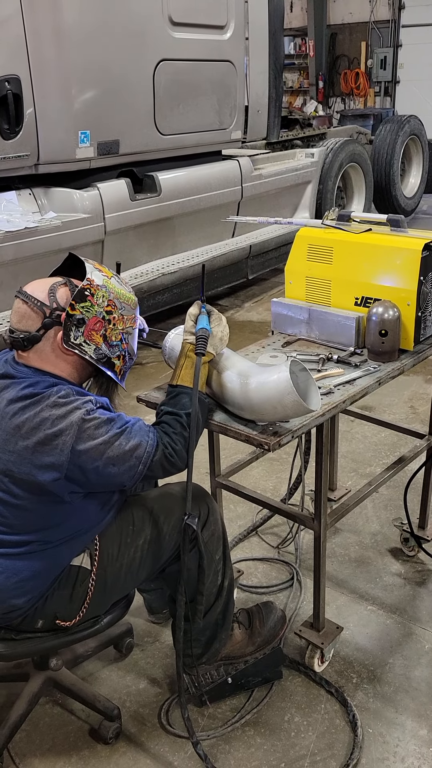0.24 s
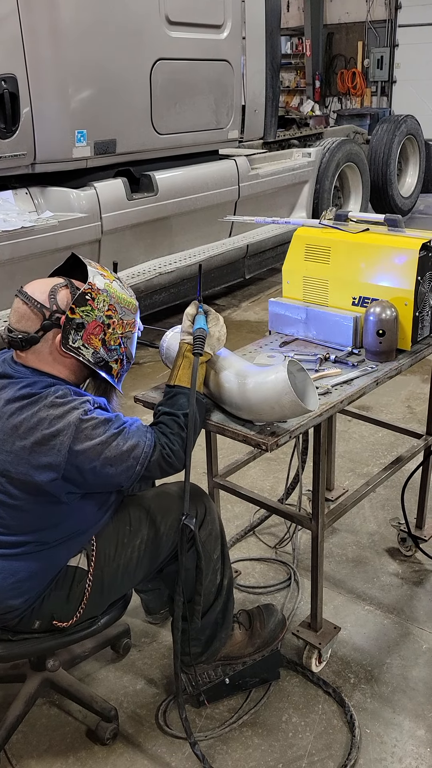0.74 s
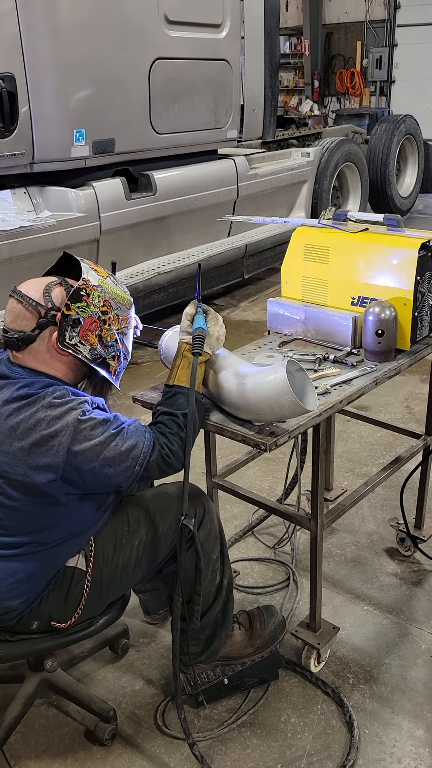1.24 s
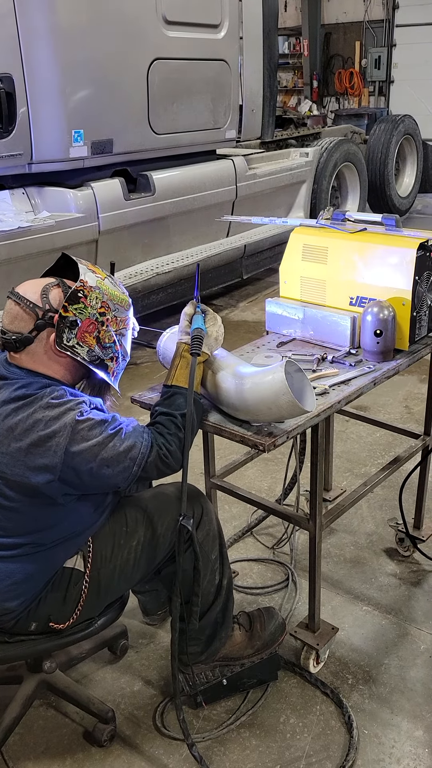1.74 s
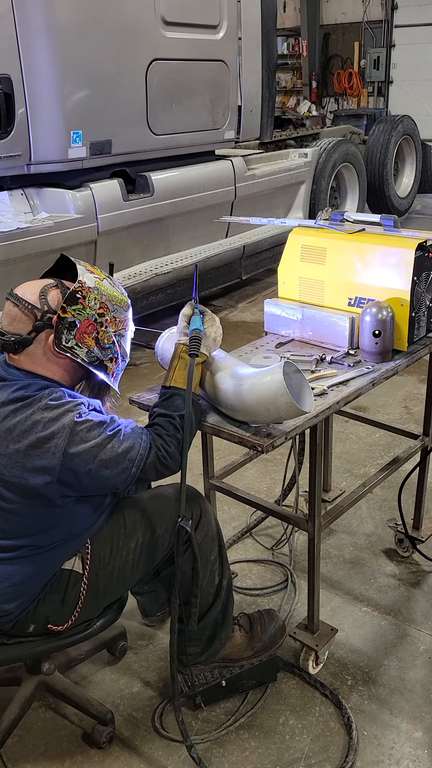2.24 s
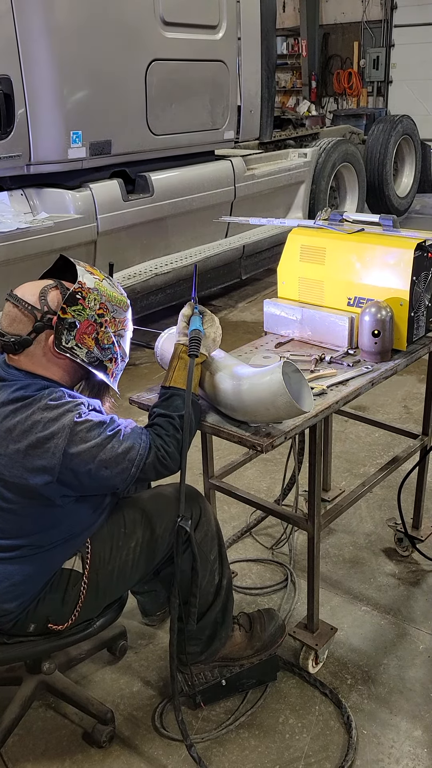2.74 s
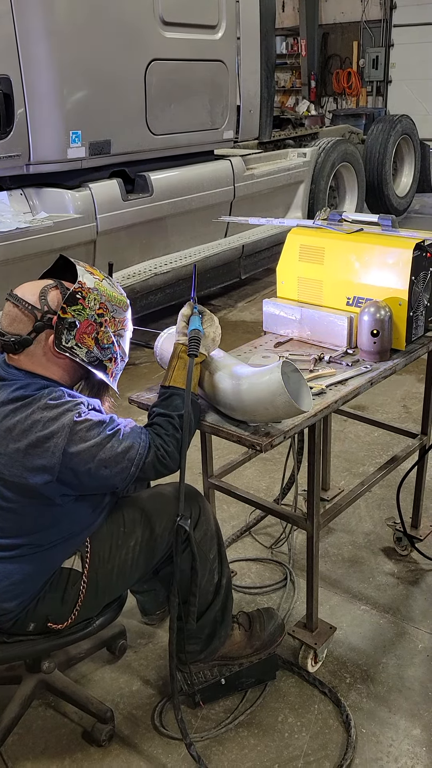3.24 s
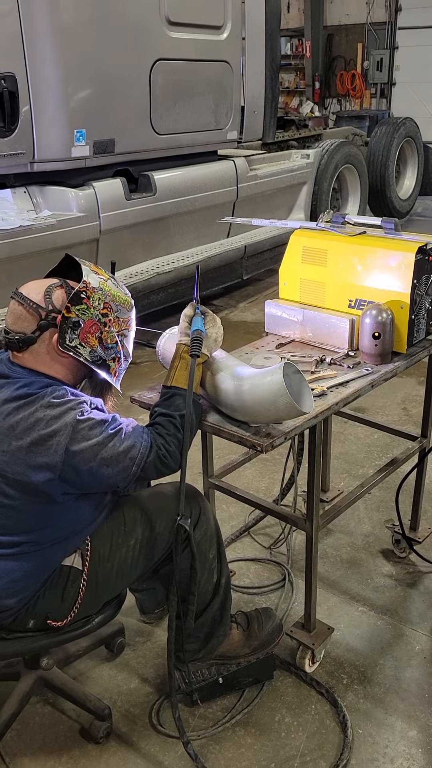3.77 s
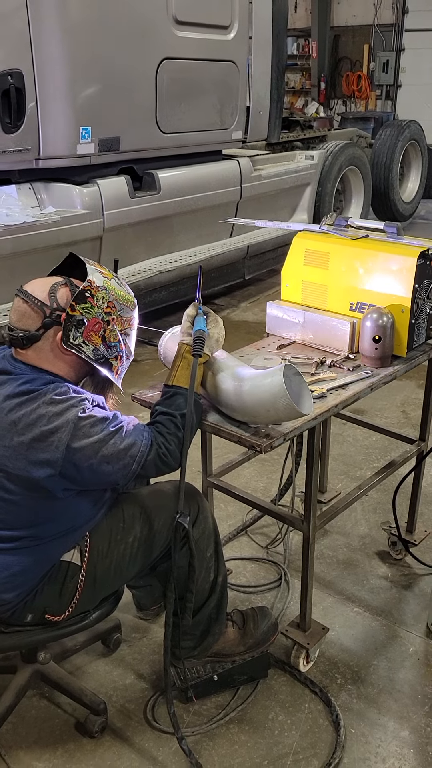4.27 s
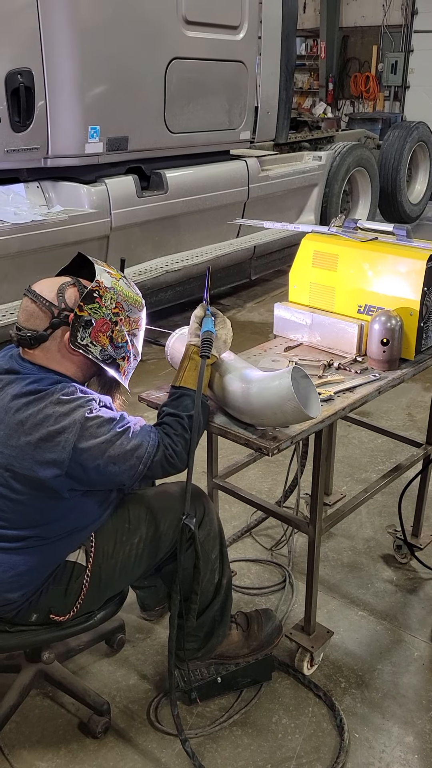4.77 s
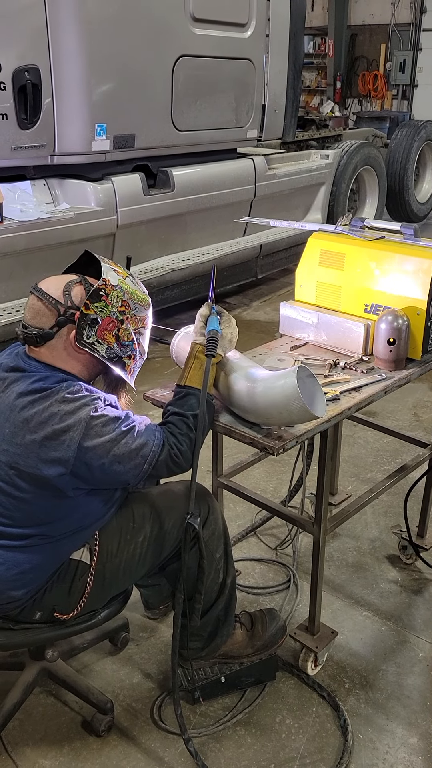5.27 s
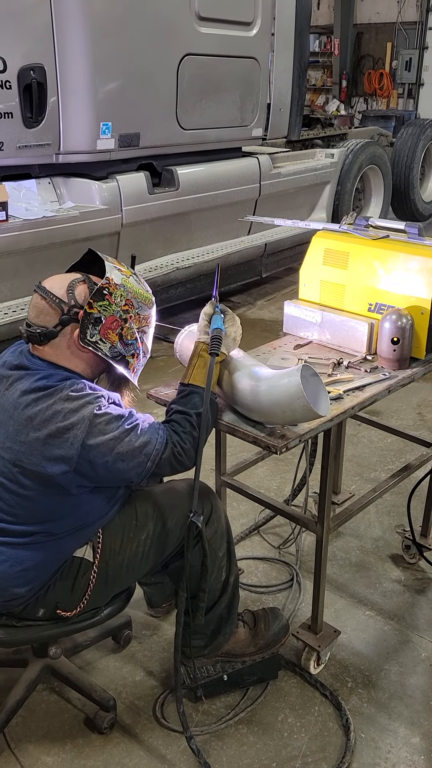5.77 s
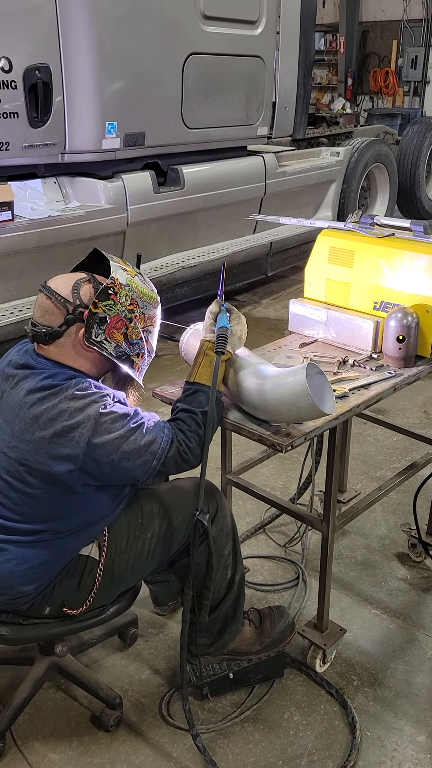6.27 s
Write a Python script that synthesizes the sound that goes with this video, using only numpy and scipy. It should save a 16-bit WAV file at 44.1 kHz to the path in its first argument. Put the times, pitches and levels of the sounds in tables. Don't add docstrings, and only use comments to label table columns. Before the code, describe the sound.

In a large vehicle workshop, a welding arc on an aluminium tube first stutters in rapid, dull, spitting pops for about a second, briefly dropping out twice. It then sputters unevenly and settles into a steady, harsh, bright buzz with fine hiss and thin whistle. Close echoes off bench and tube lead into a faint hall tail; fan and transformer hum below. A few dry ticks sound near the stereo microphone.

```python
import sys
import numpy as np
from scipy import signal
from scipy.fft import rfft, irfft, next_fast_len
from scipy.io import wavfile
from scipy.ndimage import uniform_filter1d, map_coordinates

SR = 44100
rng = np.random.default_rng(int(sys.argv[2]) if len(sys.argv) > 2 else 0)


def dump(signal):
    limited = np.clip(np.atleast_2d(signal).T, -1, 1)
    pcm = np.round(limited * 32767).astype(np.int16)
    wavfile.write(sys.argv[1], SR, pcm)


def volts_from_decibels(level):
    exponent = np.asarray(level, float) / 20
    return 10 ** exponent


N = 287091
PADDED = next_fast_len(N + SR // 2, True)
CYCLE_HZ = 66.47
BENCH_S = 0.00225


def seconds():
    return np.arange(N) / SR


def bins():
    return np.maximum(np.fft.rfftfreq(PADDED, 1 / SR), 1)


def at_hz(points, hz):
    table_hz, value = np.array(points).T
    return np.interp(np.log(hz), np.log(table_hz), value)


def rms_one(x):
    return x / np.sqrt(np.mean(x ** 2) + 1e-20)


def shaped(x, response):
    return irfft(rfft(x, PADDED) * response, PADDED)[..., :N]


def colour(x, spectrum):
    gain = volts_from_decibels(at_hz(spectrum, bins()))
    return shaped(x, rms_one(gain))


def clicks(at_s, sizes):
    at = np.asarray(at_s) * SR
    near = np.floor(at)[:, None].astype(int) + np.arange(-7, 9)
    gap = near - at[:, None]
    shape = np.sinc(gap) * np.cos(np.pi * gap / 16) ** 2
    return np.bincount(np.clip(near, 0, N - 1).ravel(), (shape * sizes[:, None]).ravel(), N)


def sputter(strikes, length_s, fresh):
    keep = np.exp(-1 / (length_s * SR))
    noise = rng.standard_normal(N)
    new = signal.lfilter([1], [1, -keep], np.abs(strikes) + 1e-18) * noise
    same = signal.fftconvolve(strikes, keep ** np.arange(400) * noise[:400])[:N]
    return np.sqrt(fresh) * new + np.sqrt(1 - fresh) * same


# time in seconds, middle of the two reversals in ms.
BEAT_ARRIVAL = [(1.08, 11.04), (2.53, 10.985), (3.82, 10.915), (4.3, 10.885), (4.78, 10.793),
                (5.27, 10.675), (5.75, 10.584), (6.23, 10.53), (6.51, 10.52)]
# time in seconds, first to second reversal in ms.
HALF_CYCLES = [(1.08, 7.17), (1.56, 7.72), (1.81, 8.14), (1.93, 8.03), (2.05, 8.15), (2.29, 8.66),
               (2.53, 8.803), (3.34, 8.796), (3.82, 8.849), (4.3, 8.836), (5.75, 8.842), (6.42, 8.856)]
# time in seconds, first reversal in dB, relight sputter in dB,
# second reversal against the first in dB.
ARC_STRENGTH = [(1.0, -18.5, -55, -14), (1.2, -12, -18.5, -3), (1.35, -14, -25, -13), (1.5, -17, -21, -4),
                (1.75, -10.5, -19.5, -8), (2.1, -12, -21, -5), (2.3, -8, -22, -4.5), (2.55, -7.5, -29, -9),
                (3.4, -8.5, -27, -7), (3.9, -9, -19.5, -10), (4.4, -9.5, -25.5, -7.5),
                (5.0, -10, -53, -7.5), (5.5, -10.5, -52, -8), (6.51, -12, -53, -4.5)]
# time in seconds, peak in dB.
JUMP_FLARES = [(1.3601, -17), (1.4953, -12), (1.601, -11), (1.7208, -14.5), (1.826, -15), (1.8565, -20),
               (1.9023, -16), (1.9313, -20), (1.9467, -15.5), (2.0216, -18), (2.0365, -16), (2.1872, -12.5),
               (2.2321, -18), (2.2775, -17.5), (2.3523, -18), (2.3977, -18)]
# time in seconds, peak in dB.
RELIGHT_SPITS = [(1.2648, -18), (1.3701, -20), (1.386, -16), (1.4299, -15), (1.4753, -19), (1.5053, -14),
                 (1.5202, -21), (1.5506, -22), (1.5651, -18), (1.5955, -13), (1.6559, -14.5), (1.6863, -18),
                 (1.7013, -17.5), (1.7312, -20), (1.7452, -20), (1.7916, -18), (1.82, -19), (1.8365, -21),
                 (1.85, -19.5), (1.9707, -21.5), (2.0171, -19), (2.046, -16), (2.1209, -22), (2.1358, -19),
                 (2.2266, -21), (2.3314, -22), (2.3618, -16)]


def jump_plan():
    start = np.arange(int(1.01 * CYCLE_HZ), int(N / SR * CYCLE_HZ)) / CYCLE_HZ
    middle_ms = np.interp(start, *np.transpose(BEAT_ARRIVAL))
    gap_ms = np.interp(start, *np.transpose(HALF_CYCLES))
    row_s, *levels = np.transpose(ARC_STRENGTH)
    first_db, sputter_db, second_db = [np.interp(start, row_s, level) for level in levels]
    second_db = first_db + second_db
    first_s = start + (middle_ms - gap_ms / 2) / 1000
    second_s = start + (middle_ms + gap_ms / 2) / 1000

    for s, db in JUMP_FLARES:
        k = np.argmin(np.abs(first_s - s))
        first_db[k] = first_db[k] + max(db + 19.5, 0)
    for s, db in RELIGHT_SPITS:
        k = np.argmin(np.abs(second_s + BENCH_S / 2 - s))
        sputter_db[k] += max(db + 22, 0)

    unrest_cold, unrest_hot, settle_s = 4.5, 0.85, 0.79
    unrest = unrest_hot + (unrest_cold - unrest_hot) * np.exp(-(start - start[0]) / settle_s)
    chance = np.clip(rng.standard_normal((len(start), 5)), -3, 1.5) * unrest[:, None]
    burst_s = second_s
    first_s = first_s + 1.5e-6 * chance[:, 0]
    second_s = second_s + 4e-6 * chance[:, 2]
    first_db = first_db + 0.96 * chance[:, 1]
    second_db = second_db + 0.21 * chance[:, 3]
    swing_db = np.minimum(0.5 * chance[:, 4], 1.2)
    burst_db = sputter_db - 2.0 + swing_db
    return (first_s, first_db), (second_s, second_db), (burst_s, burst_db)


# frequency in Hz, level in dB per Hz.
JUMP_SPECTRUM = [(180, -41), (400, -21.5), (600, -31.5), (1000, -11), (1500, -5), (2400, -4.5), (3640, 3),
                 (4670, 5), (6300, 3.5), (7600, -2), (9000, -12.5), (10800, -10.5), (12300, 6), (16000, -1)]
# frequency in Hz, level in dB per Hz.
RELIGHT_SPECTRUM = [(1500, -22), (5500, 0.5), (8500, -13.5), (10500, -8), (12500, 6.5), (16000, -1)]
# frequency in Hz, level in dB per Hz.
OXIDE_THUMP_SPECTRUM = [(300, -18), (600, -15), (750, 0.5), (950, -0.5), (1350, 8.5), (1700, 5),
                        (2200, -32), (4000, -15)]


def reversals():
    first, second, strikes = [clicks(s, volts_from_decibels(db)) for s, db in jump_plan()]
    lopsided_turn = 1.76
    slowed = signal.lfilter([0.7], [1, -0.3], second + 1e-18)
    lopsided = shaped(slowed, np.exp(1j * lopsided_turn))
    bursts = sputter(strikes, length_s=0.0014, fresh=0.61)

    oxide_until_s, clearing_s = 2.35, 0.1
    cold = 1 / (1 + np.exp((seconds() - oxide_until_s) / clearing_s))
    snap = volts_from_decibels(4.5) * colour(first + volts_from_decibels(5.5) * lopsided, JUMP_SPECTRUM)
    thump = volts_from_decibels(-10) * colour(cold * (first + second), OXIDE_THUMP_SPECTRUM)
    whistle = cup(first + second + volts_from_decibels(-5.0) * bursts)
    return snap + colour(bursts, RELIGHT_SPECTRUM) - thump + whistle


# time in seconds, pitch in Hz.
CUP_PITCH = [(1.2, 13700), (2.2, 14700), (4.0, 13200), (4.25, 12900), (5.2, 13300), (5.5, 12100),
             (6.51, 13100)]


def cup(jumps):
    hz = np.interp(seconds(), *np.transpose(CUP_PITCH))
    turning = np.exp(2j * np.pi * np.cumsum(hz) / SR)
    half_width_hz = 130
    low_pass = signal.butter(2, half_width_hz, fs=SR, output="sos")
    slow = signal.sosfilt(low_pass, jumps / turning)
    return 2 * (slow * turning).real


# time in seconds, level in dB, second catch after in ms, its level in dB.
COLD_RESTRIKES = [(.0118, 1.5, 6.9, 3), (.0422, 3, 8.5, -8), (.0713, 3, 6.3, 1), (.1017, 2.5, 10.5, -7),
                  (.1324, 2, 6.8, 4), (.1626, 2.5, 6.5, 1), (.1924, 2.5, 3.2, -7), (.2229, 2, 5.8, 1),
                  (.2515, 0, 3.9, 0), (.2815, 0, 12.2, -6), (.3131, 2.5, 6.6, 1), (.342, 1.5, 3.7, -8),
                  (.372, 2.5, 5.3, -8), (.4023, 0, 6.9, -1), (.4334, 1, 4.5, -23), (.4629, 3, 3.2, -2),
                  (.4925, 2, 7.3, 2), (.5112, -3, 5.8, -25),
                  (.5398, 3.5, 3.2, -5), (.5667, 3, 4.6, -9), (.5982, 0, 12, -8), (.6285, 2, 11, -12),
                 (.6581, 2, 6.9, 2.5), (.6888, 3, 6.7, 3), (.7184, 5, 7, 0), (.7496, 4, 3.2, -12),
                 (.778, 3.5, 6.4, 2), (.8085, 2.5, 7.5, 1), (.8398, 6, 2.6, 2), (.8672, 4.5, 13.1, 2),
                 (.8871, -4, 5.0, -23), (.906, 1.5, 6.5, -1), (.9367, 3.5, 7.4, 5), (.9669, 1.5, 7.3, 3),
                 (.9968, 1.5, 6.3, 1.5)]
# sputter of the strike in dB, of its second catch in
# dB.
RESTRIKE_SPUTTER = [(-14, -14), (-15, -22), (-14, -15), (-13, -22), (-14, -14), (-14, -15), (-15, -21),
                    (-13, -15), (-15, -18), (-16, -21), (-12, -15), (-15, -18), (-14, -20), (-14, -16),
                    (-15, -24), (-13, -13), (-14, -16), (-22, -23), (-10, -21), (-13, -20), (-14, -24),
                    (-14, -23), (-15, -16), (-14, -16), (-14, -16), (-13, -19), (-13, -17), (-15, -17),
                    (-14, -17), (-16, -16), (-18, -25), (-16, -14), (-15, -14), (-15, -14), (-14, -16)]
# time in seconds, level in dB.
LONE_CATCHES = [
    (.1346, -2),
    (.3151, -2),
    (.4956, -3),
    (.8117, -2),
    (.8505, -5),
    (1.1041, 2),
    (1.2081, 3),
    (1.5181, -10),
]


def restrikes():
    strike_s, strike_db, after_ms, again_db = np.transpose(COLD_RESTRIKES)
    s = np.append(strike_s, strike_s + after_ms / 1000)
    db = np.append(strike_db, again_db)
    bright_db = np.transpose(RESTRIKE_SPUTTER).ravel() + 19.8
    chance = rng.random((len(s), 2))
    stray_s = s + 0.002 + 0.0051 * chance[:, 0] ** 2
    stray_db = db - 5.5 + 2 * (2 * chance[:, 1] - 1)
    lone_s, lone_db = np.transpose(LONE_CATCHES)
    all_s = np.concatenate([s, stray_s, lone_s])
    thump_db = np.concatenate([db, stray_db, lone_db])
    sputter_db = np.concatenate([bright_db, stray_db, lone_db])
    return all_s, thump_db, sputter_db


# frequency in Hz, level in dB per Hz.
POP_SPECTRUM = [(150, -20.5), (280, -10), (420, -18.5), (600, -13), (750, -2), (1100, -3.5), (1300, 4),
                (1550, 3.5), (1850, 2), (2300, -2.5), (3500, -11.5), (5000, 1), (8500, -19.5), (12500, 1),
                (16000, 5)]
# frequency in Hz, level in dB per Hz.
COLD_SPUTTER_SPECTRUM = [(1500, -19), (3500, -4), (5500, 0), (7000, -6), (8500, -9.5), (10500, -8.5),
                         (12500, 4.5), (16000, 1.5)]


def pops():
    s, thump_db, sputter_db = restrikes()
    thump = colour(clicks(s, volts_from_decibels(thump_db)), POP_SPECTRUM)
    puffs = sputter(clicks(s, volts_from_decibels(sputter_db)), length_s=0.00067, fresh=0.79)
    return -volts_from_decibels(1.0) * thump + volts_from_decibels(-19.5) * colour(puffs, COLD_SPUTTER_SPECTRUM)


# start in seconds, end in seconds.
ARC_OUT = [
    (1.086, 1.104),
    (1.190, 1.208),
]


def lit():
    t = seconds()
    out = sum((t > start) & (t < end) for start, end in ARC_OUT)
    return 1 - 0.6 * uniform_filter1d(out.astype(float), size=90)


# frequency in Hz, level in dB per Hz.
HISS_SPECTRUM = [(500, -15.5), (1500, -0.5), (3000, 0), (4500, -3), (6500, 2.5), (8500, -15),
                 (10800, -15.5), (12500, 1), (16000, -1.5)]


def hiss():
    t = seconds()
    cold_ends_s, fade_s = 1, 0.077
    level_db = np.interp(t, [cold_ends_s, cold_ends_s + fade_s], [-37, -44])
    pump = volts_from_decibels(1.6 * np.cos(2 * np.pi * CYCLE_HZ * t - 2.5))
    noise = colour(rng.standard_normal((3, N)), HISS_SPECTRUM)
    near, left, right = lit() * volts_from_decibels(level_db + 2.0) * noise
    diffuse = volts_from_decibels(3.5) * np.array([left, volts_from_decibels(5.0) * right])
    return volts_from_decibels(-4.0) * pump * near, diffuse


# frequency in Hz, left minus right in dB.
PORT_BALANCE = [(100, 1.5), (200, -2), (380, -7.5), (560, -11.5), (750, 4.5), (1300, -1), (2400, 3),
                (4400, -2.5), (8000, 6.5), (15000, 1.5)]


def port_gains():
    return volts_from_decibels(np.array([[1], [-1]]) * at_hz(PORT_BALANCE, bins()) / 2)


# frequency in Hz, level in dB.
MASK_SHADOW = [(1500, 9.5), (3000, 14.5), (5000, 2), (7000, -1), (10000, 3.5), (16000, -15)]


def direct_paths():
    hz = bins()
    far_gain = 0.18 + 0.73 / (1 + (hz / 2500) ** 2)
    far_turn = 2 * np.pi * hz * 0.12 / 1000 + 0.54 * hz / (hz + 400)
    return np.array([0.79 + 0 * hz, far_gain * np.exp(-1j * far_turn)]) * volts_from_decibels(at_hz(MASK_SHADOW, hz))


def echo_response(pair):
    responses = []
    for rows in pair:
        delay_ms, gain = np.array(rows).T
        responses.append(rfft(clicks(delay_ms / 1000, gain), PADDED))
    return np.array(responses)


# time in seconds, extra echo lag in ms.
TORCH_DRIFT = [(0, 0.0), (2.3, -0.01), (3.0, -0.03), (4.3, 0.01), (5.2, 0.04), (6.0, .028), (6.51, 0.02)]
# delay after the direct sound in ms, signed gain.
FIRST_ECHOES_LEFT = [(0.32, 0.24), (0.488, 0.15), (0.88, 0.23), (0.992, 0.2), (1.2, -0.17), (1.864, -0.14),
                     (2.184, 0.29), (2.224, 0.59), (2.312, -0.52), (2.352, -0.27), (2.44, -0.4),
                     (2.512, 0.4), (2.608, -0.29), (2.712, -0.37), (3.224, 0.18), (3.28, 0.24),
                     (3.32, 0.32), (3.408, -0.31), (3.568, 0.28), (3.736, 0.18), (4.704, -0.16),
                     (8.68, -0.18), (8.872, -0.36), (8.928, -0.2), (9.312, -0.16), (11.128, -0.42),
                     (11.456, 0.31), (11.656, -0.15), (12.064, -0.24), (12.376, 0.19)]
FIRST_ECHOES_RIGHT = [(0.56, 0.21), (0.736, 0.33), (1.312, 0.16), (1.56, 0.13), (2.328, 0.24),
                      (2.368, 0.51), (2.408, 0.39), (2.72, 0.33), (2.84, 0.33), (2.88, 0.3), (3.016, 0.16),
                      (3.384, 0.33), (3.424, 0.33), (3.472, 0.36), (3.832, -0.22), (3.936, 0.23),
                      (4.016, -0.23), (4.096, 0.2), (4.432, 0.13), (5.296, 0.15), (6.12, -0.14),
                      (6.976, 0.17), (7.112, -0.3), (7.216, -0.16), (10.176, 0.17), (11.224, 0.16),
                      (11.48, -0.22), (11.52, 0.25), (12.632, -0.21), (12.816, -0.17)]
# delay after the direct sound in ms, signed gain.
MOVED_ECHOES_LEFT = [(0.256, -0.52), (2.184, 0.49), (2.224, 0.61), (2.272, -0.18), (2.312, -1.08),
                     (2.416, -0.54), (2.488, 0.41), (2.6, -0.48), (2.648, 0.48), (2.888, -0.25),
                     (3.288, 0.33), (3.36, -0.52), (3.688, 0.26), (4.128, 0.36), (6.136, -0.4),
                     (8.016, 0.22), (8.848, -0.39), (8.92, -0.54), (9.048, -0.31), (9.136, -0.4),
                     (9.376, -0.27), (11.056, -0.4), (11.12, -0.33), (11.192, -0.5), (11.328, -0.3),
                     (11.4, -0.28), (11.488, -0.6), (12.208, 0.3), (12.344, 0.39), (12.496, 0.25)]
MOVED_ECHOES_RIGHT = [(0.216, 0.31), (0.448, -0.34), (0.992, -0.27), (2.248, -0.28), (2.376, 0.29),
                      (2.464, -0.26), (2.504, -0.5), (2.544, -0.42), (2.736, 0.19), (3.24, -0.27),
                      (3.448, 0.29), (3.528, -0.3), (3.568, -0.38), (3.648, 0.2), (3.736, -0.39),
                      (3.896, 0.18), (4.024, -0.21), (6.288, -0.21), (6.88, 0.24), (6.928, 0.34),
                      (7.0, -0.31), (7.2, 0.23), (8.504, -0.26), (9.048, -0.31), (9.328, -0.25),
                      (9.576, -0.21), (11.528, 0.26), (11.72, -0.18), (12.088, 0.26), (12.576, 0.3)]


def paths(x):
    time, t = seconds(), np.arange(SR // 2) / SR
    drift_ms = np.interp(time, *np.transpose(TORCH_DRIFT))
    drifted = map_coordinates(x, [np.arange(N) - drift_ms * SR / 1000], order=3)

    split_ms = 8
    first = (FIRST_ECHOES_LEFT, FIRST_ECHOES_RIGHT)
    close = echo_response([[e for e in rows if e[0] < split_ms] for rows in first])
    overlapping = echo_response([[e for e in rows if e[0] >= split_ms] for rows in first])
    later = echo_response((MOVED_ECHOES_LEFT, MOVED_ECHOES_RIGHT))

    fading = volts_from_decibels(-23.5 - 60 * t / 0.028 - 4 * (t < BENCH_S)) * (t > 0.0006)
    scatter = rfft(fading * rng.standard_normal((2, len(t))), PADDED)
    moved_scatter = rfft(fading * rng.standard_normal((2, len(t))), PADDED)

    tube_hz, tube_t60_s, tube_db = 6600, 0.004, np.array([[-21], [-26]])
    late = np.maximum(t - BENCH_S, 0)
    tube = rfft(volts_from_decibels(tube_db - 60 * late / tube_t60_s) * np.sin(2 * np.pi * tube_hz * late), PADDED)

    hall_t60_s = 1.6
    hall_tail = volts_from_decibels(-40.5 - 60 * t / hall_t60_s) * (t > 0.008) * rng.standard_normal((2, len(t)))
    hall = rfft(hall_tail, PADDED) / (1 + bins() / 9000)

    turn = np.interp(time, [3.3, 5.7], [0, 1])
    fade_in = np.interp(time, [2.1, 2.5], [0, 1])
    before, after = drifted * (1 - turn), drifted * turn
    heard = rfft(x, PADDED) * (direct_paths() + hall)
    heard = heard + rfft(drifted, PADDED) * tube
    heard = heard + rfft(before, PADDED) * (scatter + volts_from_decibels([[0.43], [-0.7]]) * close)
    heard = heard + rfft(before * fade_in, PADDED) * overlapping
    heard = heard + rfft(after, PADDED) * (moved_scatter + volts_from_decibels([[0.2], [-1.8]]) * later)
    return irfft(heard * port_gains(), PADDED)[:, :N]


# time in seconds, level in dB.
TICK_TIMES = [
    (2.361, -17),
    (3.611, -14),
    (4.0623, -2),
    (5.111, -11),
]
# frequency in Hz, level in dB, 60 dB decay in seconds.
TICK_MODES = [(380, -30, 0.025), (1100, -16, 0.002), (1900, -5.5, 0.0027), (2840, -4.5, 0.00068)]


def ticks():
    s, db = np.transpose(TICK_TIMES)
    strikes = np.array([clicks(s + 0.00008, volts_from_decibels(db)), clicks(s, volts_from_decibels(db + 5.0))])
    out = 0
    for k, (hz, level_db, t60_s) in enumerate(TICK_MODES):
        r = volts_from_decibels(-60 / (t60_s * SR))
        w = 2 * np.pi * hz / SR
        ring = signal.lfilter([0, np.sin(w)], [1, -2 * r * np.cos(w), r * r], strikes + 1e-18)
        out = out + (-1) ** k * volts_from_decibels(level_db) * ring
    return out


# frequency in Hz, level in dB per Hz.
SHOP_SPECTRUM = [(25, -26), (50, -7.5), (80, 0.5), (105, -13.5), (150, -6), (205, -10.5), (280, -1),
                 (350, -12.5), (500, -18.5), (620, -29), (760, -9), (1000, -35), (1300, -21), (3000, -22.5),
                 (16000, -21)]
# frequency in Hz, left-right likeness from -1 to 1.
SHOP_LIKENESS = [(25, 0.96), (150, .975), (300, 0.5), (640, -.2), (16000, 0.53)]
# frequency in Hz, left rms in dB, right rms in dB,
# right lead in radians, line width in Hz.
HUM_LINES = [(120.1, -49.5, -49, -.2, .52), (240.4, -57, -54, -.15, .52), (360.3, -65, -65.5, .7, .52),
             (397, -67, -51.5, -.6, 2.37), (480.3, -53, -51, -2.0, .49), (531, -64, -60, -2.6, 1.1),
             (600.4, -60, -60, 3.1, .55), (789.7, -60, -64, 0, 1.5), (720.6, -55.5, -62, -.3, .57),
             (1200.8, -56, -62, -.9, .6)]


def shop():
    alike = np.clip(at_hz(SHOP_LIKENESS, bins()), -1, 1)
    mid, side = rng.standard_normal((2, N))
    shared = shaped(mid, np.sqrt(1 + alike))
    opposed = shaped(side, np.sqrt(1 - alike)) * [[1], [-1]]
    air = colour(shared + opposed, SHOP_SPECTRUM)
    out = shaped(volts_from_decibels(-46.5) * air, port_gains())
    for line_hz, left_db, right_db, lead, width_hz in HUM_LINES:
        wander = np.cumsum(rng.standard_normal(N)) * np.sqrt(2 * np.pi * width_hz / SR)
        phase = 2 * np.pi * line_hz * seconds() + wander + [[0], [lead]]
        out = out + volts_from_decibels([[left_db], [right_db]]) * np.sqrt(2) * np.sin(phase)
    return out


def scene():
    near, diffuse = hiss()
    torch = lit() * reversals() + near + pops()
    return paths(torch) + diffuse + ticks() + shop()


# frequency in Hz, level in dB.
SUM_DIP = [(1850, 0), (2000, -6), (2170, 2), (2330, -12.5), (2520, -5), (2730, -14), (2840, -0.5)]
# frequency in Hz, level in dB.
SUM_DIP_MOVED = [(1850, 0), (2000, -10), (2170, -4), (2330, -13), (2520, 6.5), (2730, -10.5), (2840, 0)]
# frequency in Hz, level in dB.
SUM_LIFT = [(3500, 0), (4000, 1.5), (4600, 2), (5200, -1.5), (6200, 0.5), (7200, -0.5)]


def port_sum(both):
    hz = bins()
    before, after = [shaped(both, volts_from_decibels(at_hz(dip, hz) + at_hz(SUM_LIFT, hz))) for dip in (SUM_DIP, SUM_DIP_MOVED)]
    turn = np.interp(seconds(), [3.4, 4.2], [0, 1])
    return (1 - turn) * before + turn * after


def top_cut(x):
    return signal.sosfilt(signal.butter(12, 16350, fs=SR, output="sos"), x)


def record(dry):
    left, right = 1.135 * np.tanh(dry / 1.102)
    top_hz, slope_hz = 15700, 300
    cut = volts_from_decibels(-60 * np.clip((bins() - top_hz) / slope_hz, 0, 1))
    mid = port_sum(shaped(left + right, cut))
    side = shaped(left - right, cut)
    mix = np.array([mid + side, mid - side]) / 2
    return top_cut(mix)


dry = scene()
out = record(dry)
dump(out)
```